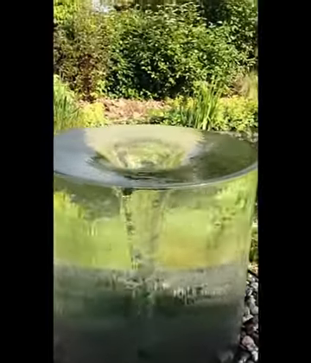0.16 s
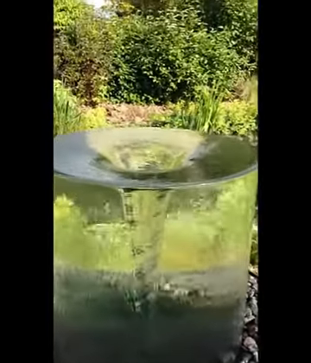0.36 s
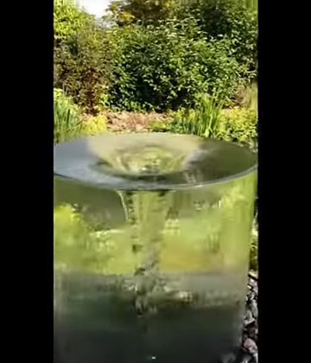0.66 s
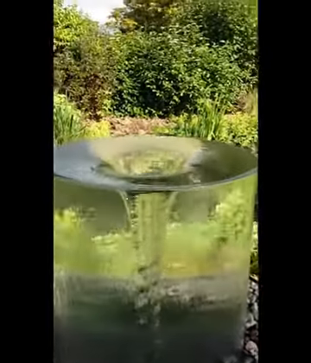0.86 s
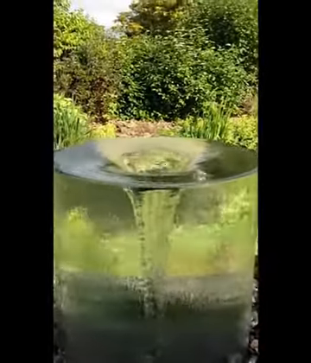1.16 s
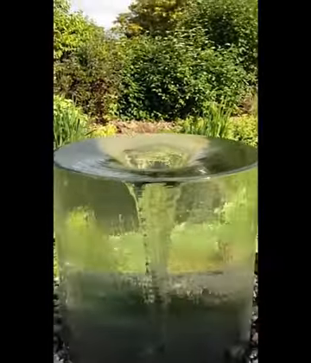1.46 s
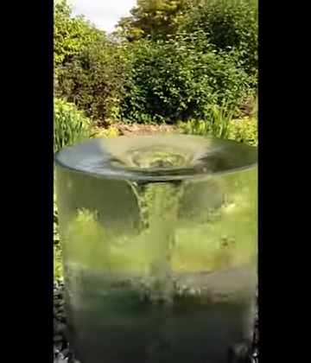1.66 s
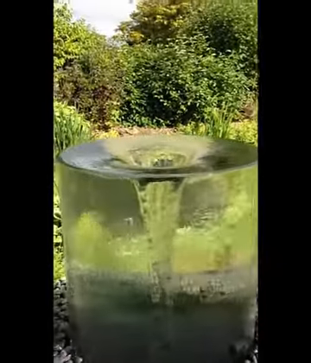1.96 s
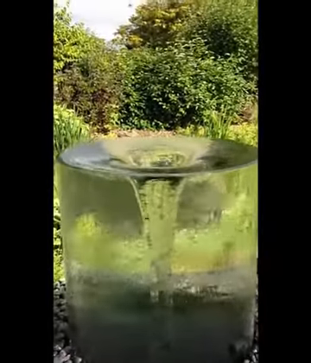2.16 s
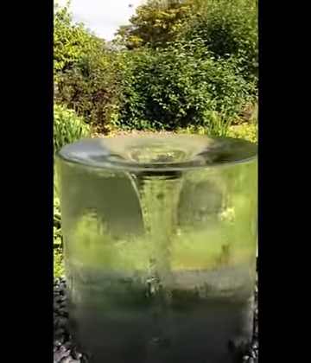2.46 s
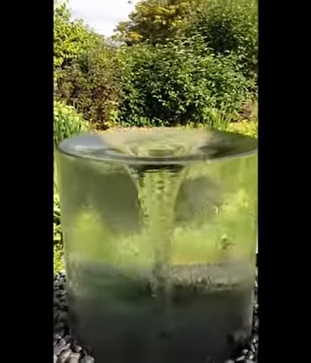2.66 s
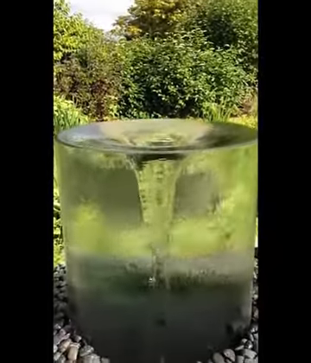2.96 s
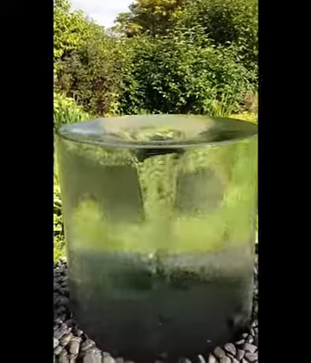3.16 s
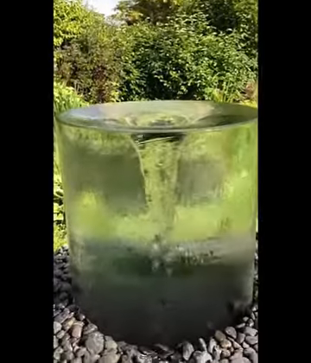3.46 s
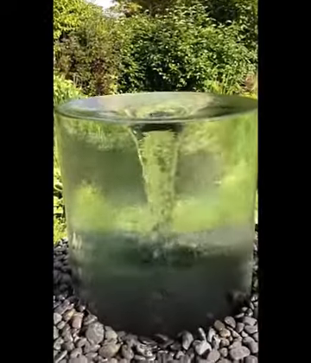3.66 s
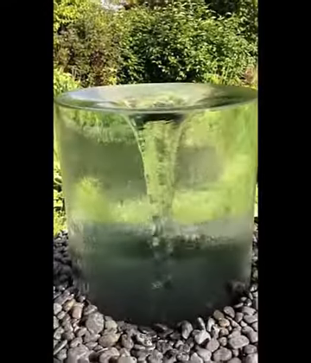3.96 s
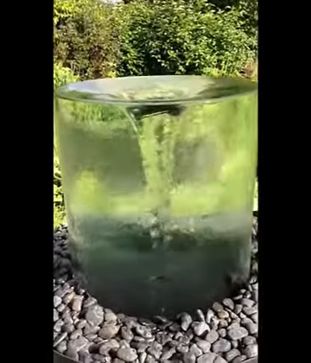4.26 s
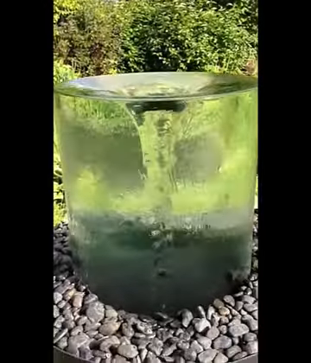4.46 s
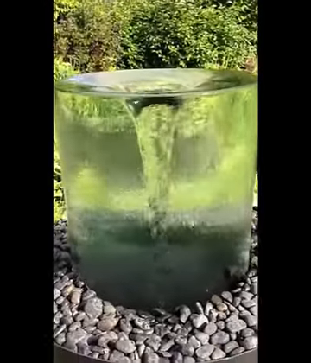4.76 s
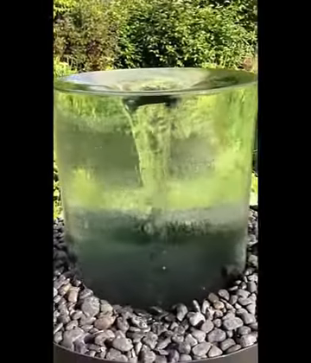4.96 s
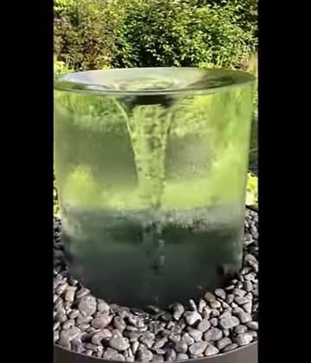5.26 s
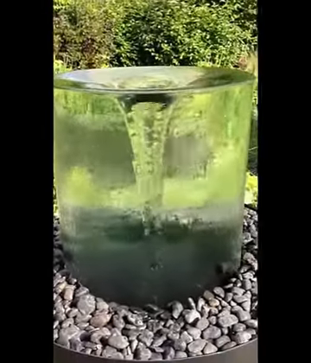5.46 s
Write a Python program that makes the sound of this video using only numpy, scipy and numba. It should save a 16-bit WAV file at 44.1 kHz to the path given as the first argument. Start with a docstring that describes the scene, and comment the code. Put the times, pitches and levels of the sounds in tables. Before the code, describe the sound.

From the start, a close, steady, bright fizz and crackle of countless tiny bubbles, centred around 2 to 4 kHz, with a faint hollow hum from the water funnel. Small splashes, glassy plinks and short gulps near 1 kHz come irregularly, several per second. Strong drips stand out at about 1.0 and 1.2 s, the sharpest at 1.57 s, with clicks near 1.95 and 2.65 s. From 2.58 to 3.0 s dull low knocks and a stuttering finger slide ring the phone case, with light hand rumble as the phone is lowered. The water then thins and quietens, the hum fading, with isolated gulps at 3.6 and 4.0 s and weak rubs near 3.6 to 3.8 s. Splashes and hiss build from 4.55 s, densest around 4.9 to 5.25 s, then ease into trickling drips until 5.6 s. Tight, short reflections; very faint low garden rumble.

```python
"""A whirlpool spins in a tall clear fountain cylinder in a quiet garden, heard close by on a hand-held phone.
Bubbles ring as decaying sines: in swarms they make the fizz, mist, gurgle, crackle and splashes; singly the
plinks. Gliding low tones gulp, bright clicks snap, the funnel hums as resonated noise and a steady tone.
The phone sinks from above the rim towards the wall, mostly half-way through, while fingers knock and slide
on its ringing case and the hand rumbles; behind lies a faint low garden rumble of filtered noise."""
import sys
import numpy as np
from scipy import signal
from scipy.fft import rfft, irfft
from scipy.io import wavfile
from scipy.ndimage import uniform_filter1d
from numba import njit

SR = 44100
rng = np.random.default_rng(int(sys.argv[2]) if len(sys.argv) > 2 else 0)


def persist_wave(psi):
    """Save psi, clipped to +-1, as 16-bit WAV."""
    counts = np.round(np.clip(psi, -1, 1) * 32767).astype(np.int16)
    wavfile.write(sys.argv[1], SR, np.atleast_2d(counts).T)


N = 246959
TIME = np.arange(N) / SR

# strength of the flow down the funnel, driving fizz, crackle and small splashes: (t/s, relative level/dB)
FLOW = [(0.0, -36.5), (0.53, -35), (0.64, -37), (0.86, -34.5), (1.06, -35.5), (1.22, -36), (1.46, -34.5),
        (1.81, -35), (2.34, -33.5), (2.83, -35), (2.89, -39.5), (2.96, -36.5), (3.1, -39), (3.35, -39.5),
        (3.46, -39), (4.18, -37), (5.08, -32.5), (5.18, -39), (5.46, -40.5), (5.6, -37)]
# place of the phone: (t/s, position [0 = above the rim .. 1 = beside the wall])
LOWERED = [(0, 0.022), (2.6, 0.065), (3.6, 0.51), (4.5, 0.64), (5.6, 0.7)]


def undb(db):
    """Decibels to gain."""
    return 10 ** (np.asarray(db) / 20)


def unit(x):
    """Scale to rms 1."""
    return x / np.sqrt(np.mean(x ** 2))


def curve(rows):
    """Join (t/s, value) rows by straight lines."""
    return np.interp(TIME, *np.transpose(rows))


def on_log_axis(hz, points_hz, values):
    """Read a spectrum between its points, along log frequency."""
    return np.interp(np.log(np.maximum(hz, 1)), np.log(points_hz), values)


def colour(x, points):
    """Causal minimum-phase filter with the given (f/Hz, level/dB) gains."""
    size = 2 ** 18
    hz = np.arange(size // 2 + 1) * SR / size
    gains = undb(on_log_axis(hz, *np.transpose(points)))
    cepstrum = irfft(np.log(gains))
    # folding the cepstrum onto positive times makes the phase causal
    cepstrum[1:size // 2] *= 2
    cepstrum[size // 2 + 1:] = 0
    return irfft(rfft(x, size) * np.exp(rfft(cepstrum)))[..., :N]


def butter(x, order, edge_hz, kind):
    """Butterworth high-pass or band-pass."""
    return signal.sosfilt(signal.butter(order, edge_hz, kind, fs=SR, output="sos"), x)


def resonate(x, hz, q):
    """Let x ring through one resonance."""
    return signal.lfilter(*signal.iirpeak(hz, q, fs=SR), x)


def wander(shape, samples):
    """Slow random drift of rms 1: noise averaged twice over the given number of samples."""
    once = uniform_filter1d(rng.standard_normal(shape), samples)
    return unit(uniform_filter1d(once, samples))


def add(out, s, x):
    """Mix x into out from time s."""
    start = int(np.clip(s * SR, 0, N - 1))
    out[..., start:start + x.shape[-1]] += x[..., :N - start]


@njit
def bubbles(length, start, hz, cycles, size, pan, rise):
    """Each bubble rings for some cycles (to -60 dB) and rises in pitch as it nears the surface."""
    out = np.zeros((2, length))
    for k in range(len(start)):
        first = int(start[k] * SR)
        life = int(cycles[k] / hz[k] * SR) + 2
        # each sample turns and shrinks the wave; glide speeds up the turning
        turn = np.exp(2j * np.pi * hz[k] / SR - np.log(1000) / life)
        glide = np.exp(2j * np.pi * hz[k] / SR * rise / life)
        wave = size[k] + 0j
        for i in range(first, min(first + life, length)):
            out[0, i] += wave.imag * (1 + pan[k])
            out[1, i] += wave.imag * (1 - pan[k])
            wave *= turn
            turn *= glide
    return out


def swarm(length, start, hz, cycles, scatter_db, width=0.23, rise=0.19):
    """Bubbles of uneven strength and damping; the highest-pitched lie widest apart."""
    life, strength, pan = rng.standard_normal((len(start), 3)).T
    sign = np.sign(rng.standard_normal(len(start)))
    size = undb(scatter_db * np.minimum(strength, 2.6)) * sign
    return bubbles(length, start, hz, cycles * np.exp(0.83 * life), size, pan * width * hz / 10000, float(rise))


def steady_swarm(per_s, hz, spread, cycles, scatter_db, rise):
    """Bubbles scattered evenly over the whole time, with pitches within a log spread either side of hz."""
    count = int(per_s * N / SR)
    where, pitch = rng.random((count, 2)).T
    pitches = hz * np.exp(spread * (2 * pitch - 1))
    return swarm(N, where * N / SR, pitches, cycles, scatter_db, rise=rise)


def ring(hz, t60, attack_s, rise):
    """One damped oscillation of peak 1 with a soft start and a gliding pitch."""
    t = np.arange(int(t60 * SR) + 8) / SR
    envelope = (1 - np.exp(-(t / attack_s) ** 2)) * np.exp(-np.log(1000) * t / t60)
    return envelope / envelope.max() * np.sin(2 * np.pi * hz * t * (1 + rise * t / t60 / 2))


def garden(level_db=-62, waver_db=2, apart=0.71, lowered_db=-3):
    """Garden air and circulating water rumble low and faint, as coloured noise of wavering level."""
    # spectrum of the rumble: (f/Hz, level/dB)
    rumble_points = [(25, -9.5), (70, -2), (160, -3), (250, 0.5), (325, -3), (500, -5), (1000, -16.5),
                     (3000, -45.5), (12000, -53)]
    noise = rng.standard_normal((3, N))
    rumble = unit(colour(noise[0] + apart * noise[1:], rumble_points))
    return undb(level_db + waver_db * wander(N, 2000) + lowered_db * curve(LOWERED)) * rumble


def hollow(hz=290.0, level_db=-62, steady_db=-68, lowered_db=-11):
    """The swirl keeps the funnel's air column humming, loudest above its mouth."""
    width_hz = 17
    hum = resonate(rng.standard_normal(N), hz, hz / width_hz)
    hum = resonate(hum, hz, 2)
    tone = unit(np.sin(2 * np.pi * hz * TIME))
    return (unit(hum) * undb(level_db) + tone * undb(steady_db)) * undb(lowered_db * curve(LOWERED))


def fizz(agitation):
    """Countless tiny bubbles, coloured differently above the rim and beside the wall."""
    # spectrum heard from above the rim: (f/Hz, level/dB)
    above_points = [(450, -43), (700, -15), (1000, -9), (1200, -21), (1350, -12), (1800, -28), (2050, 1.5),
                    (2900, -0.5), (3500, 3), (3720, -12), (4700, -8), (6400, -26.5), (9600, -24.5),
                    (12000, -37.5)]
    # spectrum heard beside the wall: (f/Hz, level/dB)
    beside_points = [(350, -39), (550, -11.5), (900, -8.5), (1500, 4.5), (1900, -7.5), (2400, 6),
                     (3000, 0.5), (3750, 14), (4700, 6), (6400, -17), (9600, -9.5), (12000, -20.5)]
    count = int(4600 * N / SR)  # 4600 bubbles per second
    where, pitch = rng.random((count, 2)).T
    # pitches from 500 to 12000 Hz, even in log frequency
    raw = swarm(N, where * N / SR, 500 * 24 ** pitch, cycles=16, scatter_db=5.7)
    raw = np.diff(raw, prepend=0)  # the quickest pulsations radiate best
    lowered = np.clip(curve(LOWERED), 0, 1)
    above = unit(colour(raw, above_points))
    beside = unit(colour(raw, beside_points))
    return agitation * ((1 - lowered) * above + lowered * beside)


def gurgle(level_db=-58.5, lowered_db=-7):
    """Middling bubbles chirp away at the funnel's tip without a pause."""
    chirps = steady_swarm(130, hz=1000, spread=0.157, cycles=22, scatter_db=3, rise=0.33)
    soft = butter(chirps, 3, [700, 1300], "band")
    return unit(soft) * undb(level_db + lowered_db * curve(LOWERED))


def funnel(x):
    """The air core rings along, less so as the phone sinks below the rim."""
    # air resonances heard through the funnel's mouth: (f/Hz, width/Hz, level/dB)
    resonances = [(1153, 38, 10), (2324, 98, 3.5), (2883, 72, 1.5), (3393, 146, 1)]
    ringing = sum(undb(db) * resonate(x, hz, hz / width) for hz, width, db in resonances)
    return x + (1 - np.clip(curve(LOWERED), 0, 1)) * ringing


def crackle(agitation, over_db=-9):
    """Single droplets tick into the water, louder while it is stirred up."""
    drops = steady_swarm(220, hz=2950, spread=0.26, cycles=18, scatter_db=4.5, rise=0.083)
    bright = butter(drops, 4, 1800, "high")
    return unit(bright) * agitation * undb(over_db)


def mist(stir, gain_db=-3.5, stirred_db=-25):
    """Pinhead bubbles burst at the surface in a fine hiss that swells with each splash."""
    # level of the hiss before its gain: (t/s, relative level/dB)
    hiss_level = [(0, -48.5), (1.9, -51), (2.5, -49), (3.3, -56), (3.85, -51), (4.25, -56), (4.68, -42),
                  (4.95, -51.5), (5.6, -50.5)]
    hiss = steady_swarm(1150, hz=6050, spread=0.15, cycles=26, scatter_db=6.5, rise=0.015)
    power = undb(curve(hiss_level) + gain_db) ** 2 + undb(stirred_db) ** 2 * stir
    return unit(np.diff(hiss, prepend=0)) * np.sqrt(power)


def grip(level_db=-66, low_hz=85, high_hz=230, uneven_db=4):
    """The hand rumbles on the case in proportion to how fast it lowers the phone."""
    speed = uniform_filter1d(np.abs(np.gradient(curve(LOWERED))), SR // 4)
    rumble = butter(rng.standard_normal(N), 2, [low_hz, high_hz], "band")
    jerks = wander(N, 1500)
    return unit(rumble * undb(uneven_db * jerks)) * undb(level_db) * speed / speed.max()


def laps():
    """Small splashes come at random, weaker than the flow and following its level.

    Rows of (t/s, relative level/dB, length/s, f/Hz)."""
    per_s, below_flow_db, typical_s, typical_hz = 16, -9.5, 0.042, 3072
    count = int(per_s * N / SR)
    s = (np.arange(count) + rng.random(count)) / per_s
    strength, length, pitch = np.clip(rng.standard_normal((count, 3)), -2, 2).T
    db = np.interp(s, *np.transpose(FLOW)) + below_flow_db + strength  # scattered by about 1 dB
    return list(zip(s, db, typical_s * np.exp(.5 * length), typical_hz * np.exp(.08 * pitch)))


def splashes(rows, spread=0.1084, gain_db=-2):
    """Each collapse frees a swarm of like-sized bubbles; also returns the power that it stirs up."""
    out, stir = np.zeros((2, N)), np.zeros(N)
    per_s = 640
    for s, db, length, hz in rows:
        t = np.arange(int(2 * length * SR) + 500) / SR
        start = (np.arange(200) + rng.random(200)) / per_s
        pitch = hz * np.exp(spread * np.clip(rng.standard_normal(len(start)), -2.2, 1.3))
        envelope = undb(db) * np.exp(-(t / length) ** 2)
        cloud = swarm(len(t), start, pitch, cycles=21, scatter_db=3.5) * envelope
        add(out, s, unit(cloud) * np.sqrt(np.mean(envelope ** 2)))
        add(stir, s, envelope ** 2)
    # the swarms hold no bubbles large enough to sound lower
    return butter(out, 6, 1900, "high") * undb(gain_db), stir


def slaps(rows, over_db=4, t60=0.014, attack_s=0.00079, rise=0.065):
    """Each splash opens with one clear ring at the middle pitch of its swarm."""
    out = np.zeros(N)
    for s, db, _, hz in rows:
        add(out, s, undb(db + over_db) * ring(hz, t60, attack_s, rise))
    return out


def gulps(gain_db=-9.5, attack_s=0.003072, swell=0.48, droop=0.85, bend=1.35):
    """Low tones glide ever faster or hold: gulps of big bubbles closing their necks, steady rings of the
    funnel's air near 1150 Hz, a few finger rasps."""
    # gliding or steady low tones: gulps of big bubbles, steady rings of the funnel's air near 1150 Hz struck by
    # bubbles, and a few rasps of the fingers; each sounds for # 1.28 lengths: (t/s, relative level/dB, first
    # f/Hz, last f/Hz, length/s, roughness [0-1])
    low_tones = [(0.02, -24.5, 1158, 1120, 0.02, 0), (0.174, -30, 1140, 1085, 0.029, 0.42),
                 (0.223, -27.5, 770, 1100, .015, 0.3), (0.274, -27, 780, 880, 0.028, 0.35),
                 (0.326, -31.5, 1137, 1150, 0.019, 0), (0.375, -35.5, 1160, 1170, 0.02, 0.2),
                 (0.448, -27.5, 702, 1170, 0.038, .4), (0.562, -29.5, 1025, 1250, 0.03, 0.54),
                 (0.617, -29, 800, 1100, 0.011, .35), (0.633, -29.5, 850, 1080, 0.01, .35),
                 (0.668, -33, 1140, 1160, 0.02, 0.2), (0.695, -30.5, 1170, 1170, 0.019, 0.1),
                 (0.785, -30, 1147, 1050, 0.043, 0.5), (0.969, -37, 467, 670, 0.02, 0.3),
                 (0.99, -22.5, 880, 1170, 0.02, .35), (1, -34, 1460, 1750, 0.01, 0.2),
                 (1.082, -31, 1140, 1160, .022, .2), (1.222, -26.5, 810, 1090, 0.042, 0.45),
                 (1.568, -33.5, 1022, 1010, 0.044, 0), (1.631, -29, 1040, 1130, 0.015, 0.6),
                 (1.695, -23, 1065, 1200, 0.016, 0.46), (1.985, -29.5, 944, 950, 0.012, 0),
                 (2.068, -30, 1150, 1193, 0.05, 0.35), (2.264, -30, 978, 1010, 0.019, 0.43),
                 (2.408, -31, 1106, 1230, 0.02, .3), (2.512, -31.5, 516, 568, 0.058, 0.3),
                 (2.602, -31.5, 1160, 1190, 0.022, 0.5), (2.743, -31.5, 845, 820, 0.011, 0),
                 (2.81, -28, 1150, 1160, 0.013, 0.2), (2.862, -29, 640, 1050, 0.016, 0.7),
                 (2.908, -38, 740, 1150, 0.022, 1), (3.14, -38.5, 975, 1270, 0.036, .5),
                 (3.196, -36, 720, 1250, 0.03, 0.6), (3.308, -37, 1020, 1220, .026, .5),
                 (3.372, -38, 733, 920, 0.039, .5), (3.613, -24, 1013, 990, 0.039, 0.12),
                 (3.796, -36.5, 870, 1055, 0.05, 0.4), (3.969, -23, 1700, 2050, .016, 0.37),
                 (4.207, -31, 1332, 1335, 0.028, 0.1), (4.335, -38, 812, 892, 0.06, 0.54),
                 (4.362, -30.5, 890, 1050, 0.052, 0.65), (5.199, -24, 1950, 2400, .028, 0.5),
                 (5.255, -32, 900, 940, 0.0094, 0.3)]
    out = np.zeros(N)
    unsteady = .05  # pitch wobble of the roughest
    for s, db, first_hz, last_hz, length, rough in low_tones:
        lasting_s = 1.28 * length
        age = np.linspace(0, 1, int(lasting_s * SR))
        size, wobble = wander((2, 8192), 90)[:, :len(age)]
        # as a share of the tone; wide glides swell slowly
        attack = attack_s / lasting_s + swell * abs(np.log(last_hz / first_hz))
        envelope = (1 - np.exp(-age / attack)) * (1 - age ** 2) * np.exp(-droop * age)
        hz = (first_hz + (last_hz - first_hz) * age ** bend) * (1 + unsteady * rough * wobble)
        tone = np.sin(2 * np.pi * np.cumsum(hz) / SR)
        add(out, s, undb(db + gain_db) * envelope / envelope.max() * (1 + rough * size) * tone)
    return out


def drips(tick_s=0.0032, swell=0.031, rise=0.081):
    """A drop strikes with a tick and traps one ringing bubble; long-ringing ones start more softly."""
    # the clearest plinks: (t/s, level/dB, f/Hz, t60/s, tick level/dB), levels before filtering
    drops = [(0.0215, -23.5, 3370, 0.0248, -49), (0.3607, -15, 3020, 0.017, -42),
             (0.3786, -21, 3030, 0.017, -47), (0.4383, -21.5, 2370, 0.035, -57),
             (0.4865, -14, 3300, 0.0066, -33), (0.5675, -19, 2960, 0.008, -48),
             (0.5738, -18, 2800, 0.016, -50), (0.6003, -20.5, 3395, 0.02, -31),
             (0.655, -33, 3340, 0.0098, -29.5), (0.889, -16, 3200, 0.009, -31),
             (1.0202, -9, 3150, 0.0056, -29), (1.04, -21, 3070, 0.0087, -46),
             (1.0633, -18, 2900, 0.014, -51), (1.0742, -19, 2900, 0.013, -54),
             (1.1405, -15.5, 3000, 0.0041, -38), (1.1664, -15, 2950, 0.0056, -20.5),
             (1.179, -11, 3200, 0.0043, -28.5), (1.2523, -19.5, 2920, 0.01, -49),
             (1.566, -16, 2970, 0.008, -50), (1.568, -2, 3150, 0.0078, -32),
             (1.5762, -14, 3000, 0.0084, -40), (1.714, -12.5, 2840, 0.016, -37),
             (1.7818, -24.5, 2200, 0.022, -39), (1.8247, -23.5, 2004, 0.0505, -31),
             (1.935, -13, 3400, 0.0084, -32), (1.94, -11.5, 3320, 0.0065, -38),
             (1.999, -15.5, 3170, 0.014, -45), (2.0474, -17.5, 3370, 0.016, -34),
             (2.1188, -15.5, 2710, 0.016, -38), (2.1465, -12.5, 2810, 0.017, -40),
             (2.201, -18.5, 3230, 0.017, -44), (2.3815, -18, 3180, 0.015, -44),
             (2.409, -19, 3340, 0.016, -54), (2.522, -21, 3370, 0.015, -24),
             (2.5526, -13, 3300, 0.013, -29), (2.6509, -11.5, 3360, 0.014, -33),
             (2.9046, -14, 2870, 0.006, -42), (3.168, -24, 3380, 0.0094, -53),
             (3.391, -22, 2570, 0.015, -55), (3.4052, -23, 2405, 0.022, -58),
             (3.977, -17, 2240, 0.014, -52), (4.1063, -20, 1900, 0.0022, -56),
             (4.349, -28, 3550, 0.026, -29), (4.8588, -12.5, 3640, 0.0091, -42),
             (4.9256, -19.5, 3030, 0.0265, -53), (5.02, -15.5, 3350, 0.013, -29),
             (5.064, -24, 2960, 0.018, -29.5), (5.1065, -27, 3430, 0.02, -35),
             (5.1965, -12.5, 2900, 0.006, -44), (5.197, -14, 1880, 0.013, -43),
             (5.298, -14.5, 3670, 0.03, -34.5), (5.335, -25, 3240, 0.0387, -53),
             (5.5187, -29, 3110, 0.022, -37)]
    # colour of the ticks: (f/Hz, level/dB)
    tick_points = [(500, -35.0), (2300, -11.5), (4500, 13.0), (6500, 5.0), (10000, -11.5), (13000, -32)]
    out, ticks = np.zeros(N), np.zeros((2, N))
    t = np.arange(SR // 60) / SR
    for s, db, hz, t60, tick_db in drops:
        add(out, s - swell * t60, undb(db) * ring(hz, t60, swell * t60, rise))
        noise = rng.standard_normal(len(t)) + 0.18 * rng.standard_normal((2, len(t)))  # nearly mono
        add(ticks, s, undb(tick_db) * np.exp(-t / tick_s) * noise)
    return butter(out, 2, 700, "high") + colour(ticks, tick_points)


def thud(tune, attack_s=0.00015, rise=-0.29):
    """The case rings once, sinking in pitch; the finger's pressure tunes it."""
    # the case's dull ring before tuning: (f/Hz, relative level/dB, t60/s)
    modes = [(149, -22, 0.023), (226, 1, 0.024), (277, -11, 0.079), (475, -16, 0.007)]
    out = np.zeros(SR // 10)
    for hz, db, t60 in modes:
        add(out, 0, undb(db) * ring(hz * tune, t60, attack_s, rise))
    return out


def fingers(slide_db=-2, low_hz=100, high_hz=640, swell=0.3, pressed=1.206):
    """Knocks and stick-slip runs ring the case; a run slows and sinks in pitch as it swells and dies."""
    # knocks on the case: (t/s, relative level/dB, pitch ratio)
    knocks = [(0.615, -39.5, 1.07), (0.637, -42, 1), (2.24, -39, 0.91), (2.5812, -21.5, 1),
              (2.6154, -27, 1.13), (2.6235, -25.5, 1.09), (2.648, -30.5, 1.15), (2.7805, -34, 1.1),
              (2.9918, -32.5, 0.72), (3.748, -40, 0.9)]
    # stuttering slides of 18 slips: (t/s, relative level/dB, time scale/s, rough first rate/slips per s)
    slides = [(2.594, -34, 0.1, 142), (2.761, -38.5, 0.032, 135), (2.834, -38.5, 0.056, 115),
              (2.912, -27, 0.058, 143), (3.633, -41, 0.043, 115), (3.755, -45, 0.026, 120)]
    out = np.zeros(N)
    uneven, slowing = .025, 0.194  # scatter of the slip periods; their growth per time scale
    for s, db, tune in knocks:
        add(out, s, undb(db) * thud(tune))
    for s, db, length, slip_hz in slides:
        age = 0
        for stretch in 1 + uneven * rng.standard_normal(size=18):
            slack = 1 + slowing * age / length
            period = stretch / slip_hz * slack
            force = (age + period) / (swell * length)
            add(out, s + age, undb(db + slide_db) * force * np.exp(1 - force) * thud(pressed / slack))
            age += period
    return butter(out, 3, [low_hz, high_hz], "band")


def snaps(t60=0.003, attack_s=0.0001, spatter_db=-12, spatter_s=0.0049, spread=1.02):
    """Short bright clicks, each a brief ring with a fading spatter of narrow-band noise."""
    # short bright clicks, one of them the overloaded edge of the loudest plink:
    # (t/s, relative level/dB, f/Hz)
    clicks = [(0.669, -24, 6000), (1.146, -21, 6200), (1.469, -37.5, 10200), (1.5683, -22, 13500),
              (1.745, -26.5, 6300), (1.946, -14.5, 6060), (2.042, -26, 6100), (2.124, -26, 6270),
              (2.6493, -19, 6300), (2.6513, -21, 9700), (2.6626, -29, 6600), (3.128, -35.5, 6200),
              (3.595, -30, 5530), (3.74, -30.5, 5760), (3.882, -22, 5360), (3.948, -36, 10100),
              (4.178, -29, 5940), (4.693, -21, 5800), (4.804, -25, 6500), (4.8585, -22, 4500),
              (4.981, -22.5, 6100)]
    out = np.zeros(N)
    t = np.arange(SR // 60) / SR
    for s, db, hz in clicks:
        spatter = butter(rng.standard_normal(len(t)), 2, [hz / spread, hz * spread], "band")
        add(out, s, undb(db) * ring(hz, t60, attack_s, 0))
        add(out, s, undb(db + spatter_db) * unit(spatter) * np.exp(-t / spatter_s))
    return out


def cylinder(x, t60=0.052, wet_db=-9, apart=0.56, gap_s=0.0024, size=1024):
    """Sound rattles briefly between wall and water; the spinning surface keeps changing the echoes."""
    t, wet = np.arange(int(.1 * SR)) / SR, np.zeros((2, N))
    fade = np.exp(-np.log(1000) * t / t60) * (t > gap_s)
    window = signal.get_window("hann", 2 * size)
    # overlapping stretches, each with echoes of its own
    for first in range(0, N - 2 * size, size):
        noise = rng.standard_normal((3, len(t)))
        tail = (noise[0] + apart * noise[1:]) * fade / np.sqrt(np.sum(fade ** 2))
        stretch = x[:, first:first + 2 * size] * window
        add(wet, first / SR, signal.fftconvolve(stretch, tail, axes=1))
    return x + undb(wet_db) * wet


def scene(flow_db=-3.3, spray_db=-10):
    """Splashes stir up the fizz; all but the hum, the handling and the garden sounds in the cylinder."""
    # the big splashes, each a swarm of bubbles: (t/s, relative level/dB, length/s, f/Hz)
    big = [(0.051, -30.5, 0.012, 2930), (0.078, -31.5, 0.033, 3050), (0.187, -33.5, 0.035, 2920),
           (0.264, -42, 0.042, 2980), (0.337, -32, 0.021, 2880), (0.354, -32, 0.022, 2970),
           (0.567, -37, 0.036, 2580), (0.889, -26, 0.0087, 3000), (1.064, -35, 0.013, 3020),
           (1.083, -32, 0.059, 3030), (1.139, -30, 0.019, 3030), (1.225, -30.5, 0.049, 2740),
           (1.575, -32.5, 0.037, 2960), (1.659, -34.5, 0.055, 2910), (1.877, -30.5, 0.032, 3130),
           (1.957, -27.5, 0.018, 2770), (2.008, -35, 0.053, 2950), (2.151, -30.5, 0.021, 2930),
           (2.252, -33.5, 0.052, 3000), (2.41, -31.5, 0.043, 3270), (2.521, -29, 0.0041, 2970),
           (2.66, -31, 0.0092, 2730), (2.745, -32.5, 0.014, 2940), (2.807, -35, 0.064, 3150),
           (3.038, -40, 0.017, 2750), (3.095, -39, 0.016, 3500), (3.256, -34.5, 0.012, 2960),
           (3.383, -34, 0.028, 2610), (3.543, -40, 0.16, 3250), (3.917, -36, 0.036, 3280),
           (3.956, -33.5, 0.047, 2940), (4.083, -38, 0.0069, 3200), (4.246, -35.5, 0.016, 3470),
           (4.385, -38.5, 0.046, 2820), (4.555, -34.5, 0.035, 3450), (4.597, -27, 0.026, 3170),
           (4.66, -28, 0.018, 2430), (4.684, -30.5, 0.023, 3100), (4.828, -32, 0.009, 3300),
           (4.942, -25, 0.014, 3530), (4.995, -27.5, 0.042, 3360), (5.063, -28.5, 0.017, 3380),
           (5.106, -25, 0.019, 3340), (5.161, -27.5, 0.0092, 3570), (5.199, -24.5, 0.023, 2840),
           (5.217, -25, 0.031, 3010), (5.44, -31.5, 0.046, 3110), (5.517, -33, 0.026, 2970)]
    rows = big + laps()
    swarms, stir = splashes(rows)
    agitation = np.sqrt(undb(curve(FLOW) + flow_db) ** 2 + undb(spray_db) ** 2 * stir)
    through_funnel = funnel(fizz(agitation) + swarms + gurgle())
    surface = crackle(agitation) + mist(stir) + slaps(rows) + drips() + snaps()
    water = cylinder(through_funnel + surface + gulps())
    return water + hollow() + fingers() + grip() + garden()


def record(dry):
    """Each channel is coloured and phase-shifted; high peaks are flattened and the top is cut."""
    # colour of the two channels, with dips and a steep fall above 12 kHz:
    # (f/Hz, left level/dB, right level/dB, left lead/rad)
    channels = [(40, 0, -1, 0), (90, -1, -8, 2.2), (170, 3, -12, 1.7), (300, 3, -4, 1.2), (550, 1, -1, .7),
                (1000, -1.5, 1.5, .5), (2500, -1, 1, .25), (3920, 0, 0, .3), (4150, -15, -15, 0),
                (4290, -15, -17, 0), (4550, 2, -6, .6), (4920, 2, -17, .8), (5180, -15, -18, 1.5),
                (5480, -4, 0, -1), (5900, -1, -3, -.5), (6400, 2, -5, -1.3), (7250, -5, -7, -1.6),
                (7800, -21, -23, -2.5), (8550, -20, -17, -2.2), (9050, -3, 1, -1.7), (10000, 0, 4, -1.5),
                (10450, 1, -3, -1), (10900, -16, -14, -2.4), (11500, -3, -3, -1), (11950, -6, -6, 0),
                (12500, -32, -32, 0), (13300, -36, -36, 0), (14100, -25, -25, 0), (15000, -40, -40, 0)]
    size, top_hz = 2 ** 18, 14800
    hz, left_db, right_db, lead = np.transpose(channels)
    bins = np.arange(size // 2 + 1) * SR / size
    both = rfft(colour(dry, np.transpose([hz, (left_db + right_db) / 2])), size)
    # half the difference in level and phase goes to each side
    turn = np.exp(1j * on_log_axis(bins, hz, lead) / 2)
    apart = undb(on_log_axis(bins, hz, left_db - right_db) / 2) * turn
    flattened = np.clip(irfft(both * [apart, 1 / apart])[:, :N], -.42, .42)
    return signal.sosfilt(signal.ellip(8, .2, 70, top_hz, fs=SR, output="sos"), flattened)


dry = scene()
out = record(dry)
persist_wave(out)
```